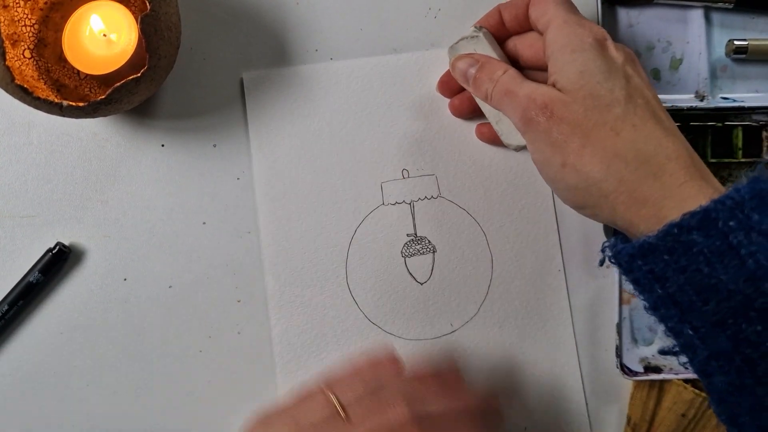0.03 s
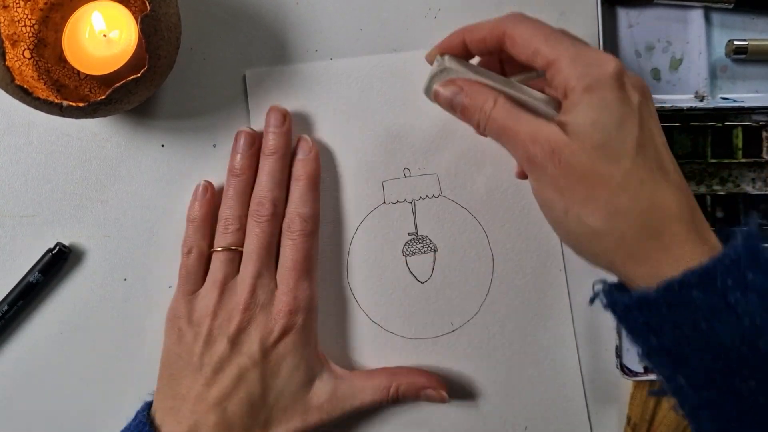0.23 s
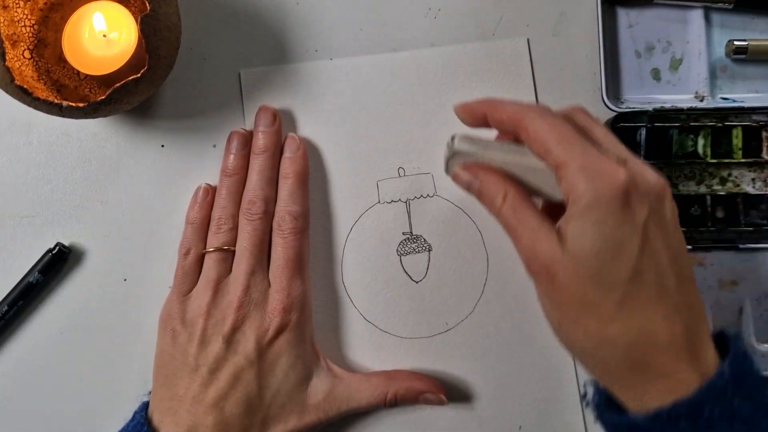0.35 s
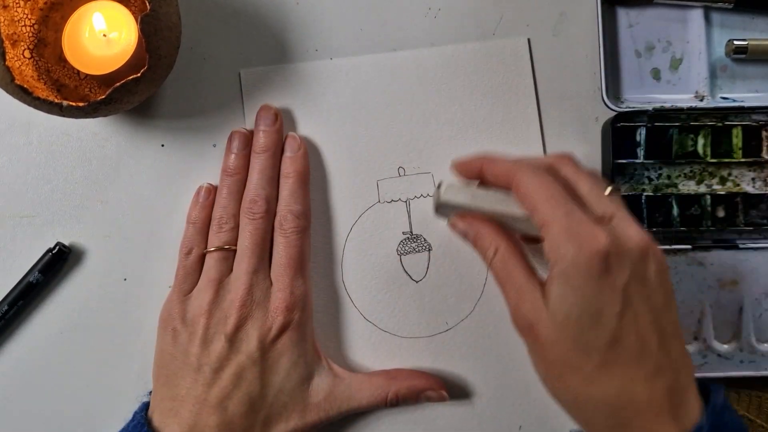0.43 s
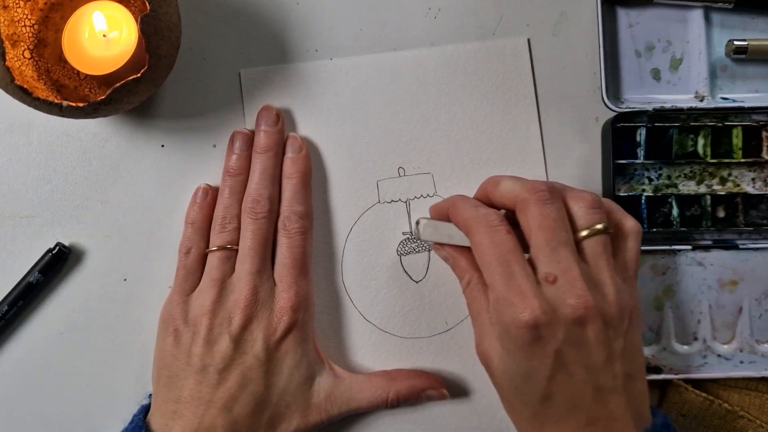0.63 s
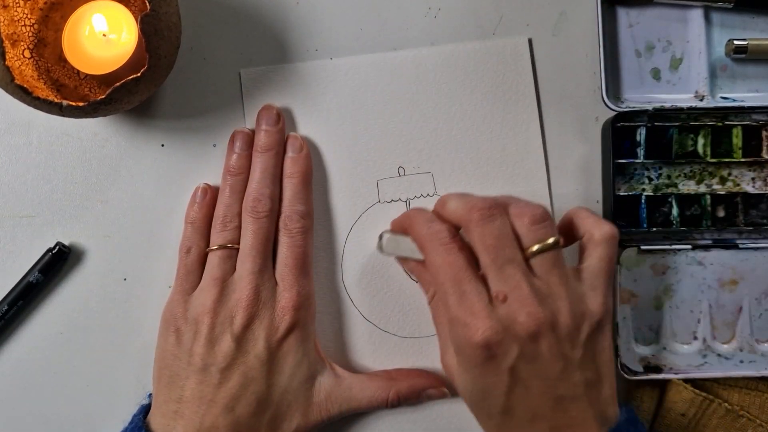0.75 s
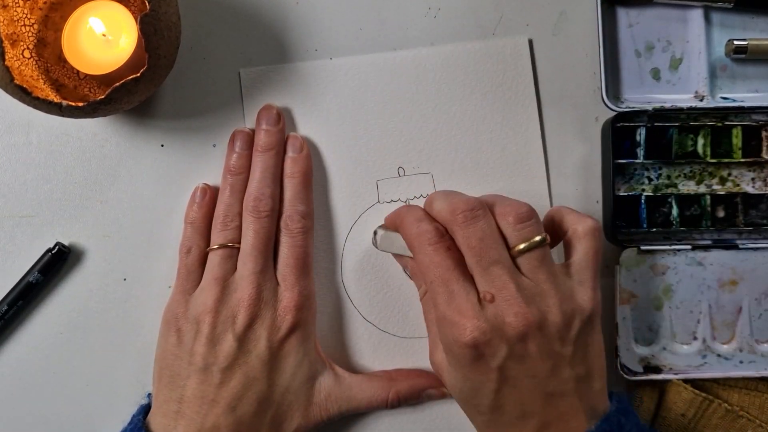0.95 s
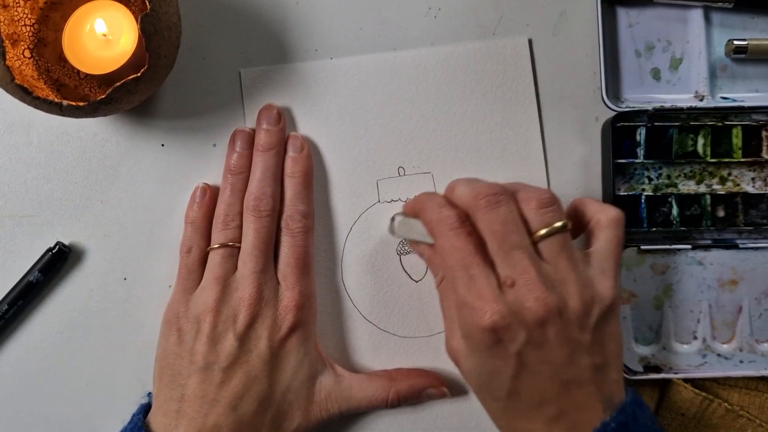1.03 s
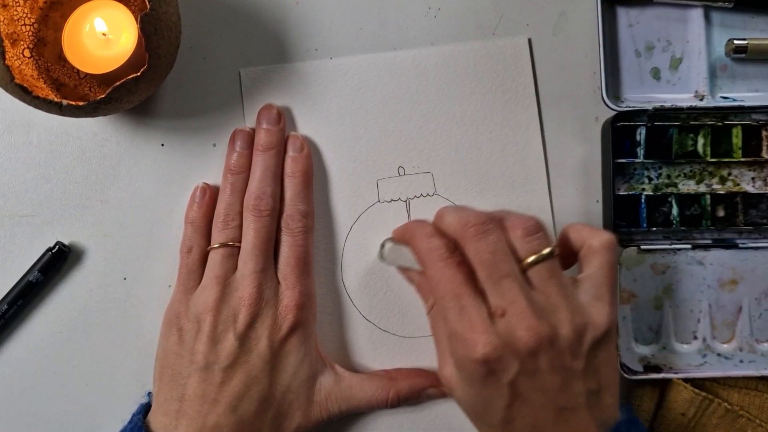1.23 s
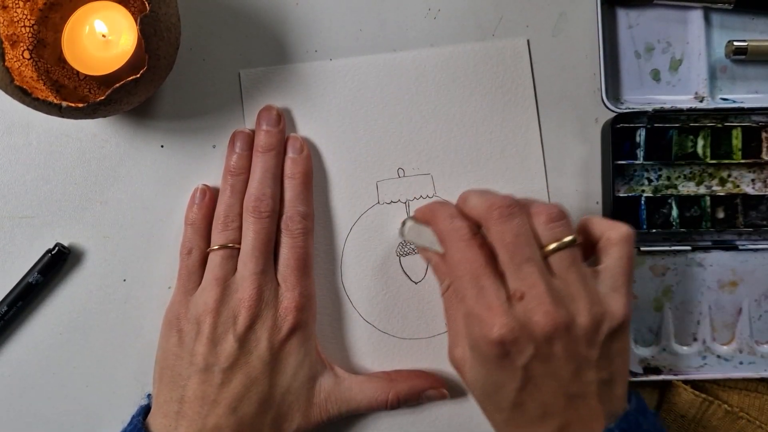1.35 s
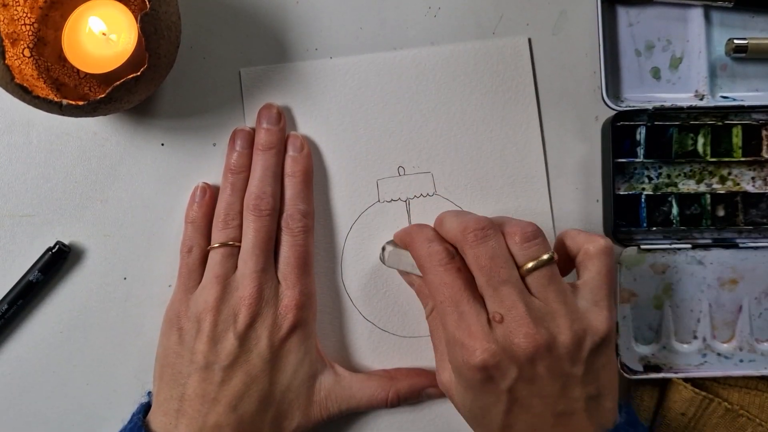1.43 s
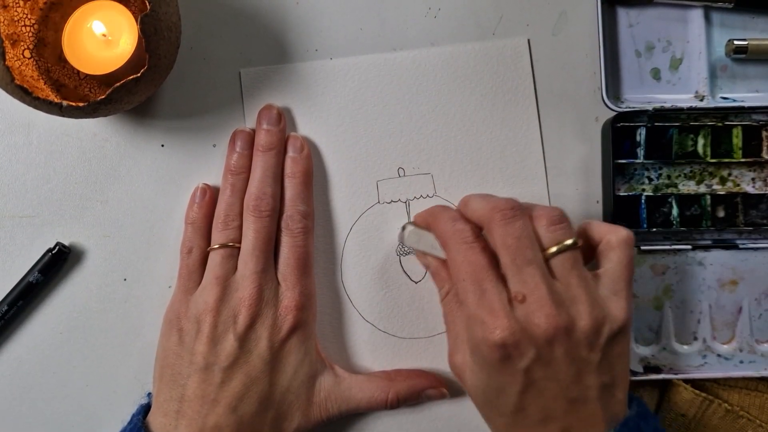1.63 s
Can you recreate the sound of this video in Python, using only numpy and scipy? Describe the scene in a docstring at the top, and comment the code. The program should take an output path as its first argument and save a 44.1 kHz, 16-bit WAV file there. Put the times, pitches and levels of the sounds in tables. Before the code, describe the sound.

An eraser rubs thick paper in short soft strokes after one sharp hard tap on the desk

```python
"""An eraser rubs pencil lines off thick paper on a desk: short strokes of filtered friction grains.
As the hands settle, something hard taps the desk and bounces once, ringing modes and a noisy clack.
Noise bumps of the hands and sheet, two swishes of skin, two ticks and a creaky scuff with a faint squeak join in.
All is close to a stereo microphone in a small room, over steady room noise and a low desk rumble."""
import sys
import numpy as np
from scipy import signal
from scipy.fft import rfft, irfft
from scipy.io import wavfile

SR = 44100
rng = np.random.default_rng(int(sys.argv[2]) if len(sys.argv) > 2 else 0)


def wrap_up_sound(samples):
    """Save the sound to the file named by the first command line argument, as 16-bit audio."""
    columns = np.atleast_2d(samples).T
    # keep every value between -1 and 1, then stretch to whole-number steps
    tamed = np.clip(columns, -1, 1)
    steps = np.round(tamed * 32767).astype(np.int16)
    wavfile.write(sys.argv[1], SR, steps)


N = 74970  # samples
T = np.arange(N) / SR  # time axis, s
SIZE = 131072  # FFT length, samples
HZ = np.maximum(np.fft.rfftfreq(SIZE, 1 / SR), 1)  # frequency axis, Hz


def amp(db):
    """Decibels to gain."""
    return 10 ** (np.asarray(db) / 20)


def unit(x):
    """Scale to rms 1."""
    return x / np.sqrt(np.mean(x ** 2) + 1e-20)


def at_hz(points, hz):
    """Read a (Hz, value) table along log frequency."""
    f, value = np.transpose(points)
    return np.interp(np.log(hz), np.log(f), value)


def level(points):
    """Gain over time from (s, dB) points."""
    return amp(np.interp(T, *np.transpose(points)))


def fade(t, t60):
    """Decay by 60 dB in t60 seconds, silent before t = 0."""
    return (t >= 0) * np.exp(-np.log(1000) * np.maximum(t, 0) / t60)


def colour(x, db):
    """Causal (minimum-phase) filter with the given gain in dB at each frequency of HZ."""
    cepstrum = irfft(np.log(amp(db)))
    # Folding the cepstrum onto positive times makes the filter minimum-phase.
    cepstrum[1:SIZE // 2] *= 2
    cepstrum[SIZE // 2 + 1:] = 0
    response = np.exp(rfft(cepstrum))
    return irfft(rfft(x, SIZE) * response)[..., :N]


def ring(x, hz, t60):
    """One mode: a unit click sets a decaying sine of height 1 ringing."""
    radius = np.exp(-np.log(1000) / (t60 * SR))
    w = 2 * np.pi * hz / SR
    return signal.lfilter([0, np.sin(w)], [1, -2 * radius * np.cos(w), radius * radius], x + 1e-18)


def click(s):
    """A unit click at time s."""
    return 1. * (np.arange(N) == int(s * SR))


def grains(per_s, spread_db):
    """Random tiny slips of uneven size and either sign; rms 1."""
    sizes = amp(spread_db * np.minimum(rng.exponential(1, N), 5))
    signs = rng.choice([-1, 1], N)
    return unit(sizes * signs * (rng.random(N) < per_s / SR))


def wander(hz):
    """Random wavering, low-passed at the given rate; rms 1."""
    lowpass = signal.butter(2, hz, fs=SR, output="sos")
    return unit(signal.sosfilt(lowpass, rng.standard_normal(N)))


def diffuse():
    """White stereo noise, much alike on both sides in the bass and nearly unrelated in the treble."""
    # Left-right likeness: f/Hz, likeness 0-1
    likeness = [(50, 0.89), (330, 0.86), (700, .35), (1500, 0.057), (8000, 0.023)]
    mid, side = rfft(rng.standard_normal((2, SIZE)))
    alike = np.clip(at_hz(likeness, HZ), 0, 1)
    return irfft(np.sqrt(1 + alike) * mid + np.sqrt(1 - alike) * side * [[1], [-1]])[:, :N]


def swing(start, length, peak):
    """Loudness of one stroke: the hand speeds up to its peak and slows to a stop."""
    speed_power = 0.9
    peak_time = start + length * np.clip(peak, .05, .95)
    phase = np.interp(T, [start, peak_time, start + length], [0, .5, 1])
    return np.maximum(np.sin(np.pi * phase), 0) ** speed_power


def contact(x, bright_hz, cut_hz):
    """A contact's softness rounds off the treble, its lightness takes away the bass."""
    r = np.exp(-2 * np.pi * bright_hz / SR)
    softened = signal.lfilter([(1 - r) ** 2], [1, -2 * r, r * r], x + 1e-18)
    return signal.lfilter(*signal.butter(1, cut_hz, "high", fs=SR), softened)


def skin(start, length, db, peak, spectrum):
    """Skin slides over paper or desk in one fine-grained swish."""
    swish = unit(colour(grains(per_s=4600, spread_db=2.0), at_hz(spectrum, HZ)))
    return amp(db) * swing(start, length, peak) * swish


def background():
    """Steady noise gives the room's hush; swelling bass noise is the desk under the working hands."""
    # Spectrum of the room noise: f/Hz, level/dB
    hush_colour = [(25, -1.5), (50, -1.5), (85, -6.5), (140, -16), (220, -19), (350, -14), (500, -22.5),
                   (1000, -21.5), (2000, -23), (4000, -29), (8000, -39.5), (11000, -50.5), (16000, -57.5)]
    # Spectrum of the desk rumble: f/Hz, level/dB
    rumble_colour = [(20, -6), (40, -3), (65, -6), (100, -26.5), (250, -49), (800, -70)]
    # Rumble fader: t/s, level/dB
    rumble_level = [(0, -84), (.2, -75), (.27, -50), (.4, -65.5), (.56, -74.5), (.7, -69), (.95, -68),
                    (1.08, -74), (1.3, -74), (1.4, -59.5), (1.53, -72), (1.66, -57.5)]
    hush_db = -70
    hush = amp(hush_db) * unit(colour(diffuse(), at_hz(hush_colour, HZ)))
    rumble = level(rumble_level) * unit(colour(diffuse(), at_hz(rumble_colour, HZ)))
    return hush + rumble


def eraser():
    """Rubber catches on paper fibres; each stroke has its own pressure and brightness."""
    # Strokes: start t/s, length/s, level/dB, treble tilt/dB per octave, place of the peak/0-1
    strokes = [(0.132, 0.047, -68.5, 11, 0.2), (0.645, 0.071, -62, -0.5, 0.57),
               (0.762, 0.084, -61.5, 0.5, 0.68), (.888, 0.076, -64, 0, 0.4),
               (1.009, 0.066, -63.5, 1.5, 0.62), (1.112, 0.083, -61, -2.5, 0.34),
               (1.237, 0.075, -65.5, 2, 0.55), (1.343, 0.096, -63, -4.5, 0.27),
               (1.479, 0.076, -66.5, 0.5, 0.46), (1.597, 0.065, -66.5, -5, 0.13)]
    # Spectrum of rubbed paper: f/Hz, level/dB
    paper_colour = [(300, -14), (1000, -14), (2200, -11), (3300, -7), (4400, 1.5), (5000, -5.5),
                    (5450, 2.5), (5900, -6.5), (7000, -9), (7800, -9.5), (9700, -14.5), (11300, -22),
                    (13500, -23), (16000, -27)]
    chatter_db, chatter_hz = 1.17, 110.4  # rms depth and rate limit of the rubber's fluttering grip
    tilt_pivot_hz = 5490
    grip = amp(chatter_db * wander(chatter_hz))
    friction = grains(per_s=17000, spread_db=2.5) * grip
    paper = at_hz(paper_colour, HZ)
    # The tilt levels out below half the pivot.
    octaves = np.log2(np.maximum(HZ, tilt_pivot_hz / 2) / tilt_pivot_hz)
    rubbing = 0
    for start, length, db, tilt, peak in strokes:
        rub = unit(colour(friction, paper + tilt * octaves))
        rubbing = rubbing + amp(db) * swing(start, length, peak) * rub
    return rubbing


def tap():
    """A quick cluster of hard contacts, a bounce and a last touch excite modes, a short clack and desk sway."""
    # Hard contacts on the desk: t/s, level/dB, brightness f/Hz, bass cut f/Hz
    hits = [(0.2243, -31.5, 11110, 476), (0.2325, -27, 10820, 500), (.2392, 1, 6030, 198),
            (0.2427, -2, 11000, 201), (0.2466, -0.5, 6100, 150), (0.253, -4.5, 5000, 150),
            (0.2576, -4, 6000, 200), (.268, -9.5, 9000, 300), (.3105, -6.5, 4140, 1290),
            (0.314, -12, 3700, 900), (.323, -13.5, 2950, 700), (.337, -18, 2800, 600),
            (0.5972, -38.5, 6000, 800)]
    # Ringing modes: f/Hz, level/dB, t60/s
    tap_modes = [(356, -22, 0.48), (723.7, -19, 0.5), (1076, -18.5, 0.64), (1369.4, -3, 0.15),
                 (1524, -14.5, 0.057), (1715, -6.5, 0.056), (2042, -1, 0.11), (2092, -11.5, 0.064),
                 (2648, -10.5, 0.089), (3259, -15.5, 0.11), (3355, -9.5, 0.067), (4086, -19, .13),
                 (4720, -14, 0.1)]
    # Spectrum of the dense clack under the modes: f/Hz, level/dB
    clack_colour = [(40, -18.5), (150, -24.5), (300, -17), (500, -10.5), (900, -10), (1450, 1.5),
                    (1850, -6), (2080, 2), (2350, -3), (2700, -1), (3400, -3.5), (4500, -14.5),
                    (5400, -24.5), (6400, -16.5), (8000, -21), (11000, -28), (16000, -29)]
    ring_db, clack_db, clack_t60 = -27, 12.5, .022  # dB, dB, s
    desk_hz, desk_db, desk_t60 = 36, -63, .4  # sway of the desk top: Hz, dB, s
    mode_spread_db = 4  # each contact favours other modes

    forces = np.array([amp(db) * contact(click(s), bright_hz, cut_hz)
                       for s, db, bright_hz, cut_hz in hits])
    shares = amp(mode_spread_db * rng.standard_normal((len(hits), len(tap_modes))))
    ringing = 0
    for share, (hz, db, t60) in zip(shares.T, tap_modes):
        ringing = ringing + amp(db + ring_db) * ring(share @ forces, hz, t60)

    noise = unit(diffuse()) / np.linalg.norm(fade(T, clack_t60))  # a burst has energy near 1
    cracks = 0
    for s, db, bright_hz, cut_hz in hits:
        burst = noise * fade(T - s, clack_t60)
        cracks = cracks + amp(db) * contact(burst, bright_hz, cut_hz)
    clack = colour(cracks, at_hz(clack_colour, HZ) + clack_db)

    sway = amp(desk_db) * ring(forces.sum(axis=0), desk_hz, desk_t60)
    return clack + ringing + sway


def bumps():
    """Hands and sheet bump dully against the desk: soft-edged bursts of low noise."""
    # Bumps: t/s, level/dB, tilt/dB per octave
    thuds = [(0.234, -52, -0.5), (.26, -57, -5), (.68, -62, 0), (1.114, -57, -2.5), (1.143, -54.5, -2),
             (1.302, -60.5, 2), (1.352, -59, 0), (1.404, -58, 2), (1.594, -56.5, -.5), (1.656, -68.5, 1.5)]
    # Spectrum of a bump before its tilt: f/Hz, level/dB
    bump_colour = [(25, -12.5), (60, 1.5), (110, -3.5), (175, 4.5), (260, -9), (360, 2), (450, -22.5),
                   (900, -28), (3000, -50.5)]
    attack, t60, pivot_hz = 0.0036, 0.19, 150  # s, s, Hz
    noise, octaves = diffuse(), np.log2(HZ / pivot_hz)
    dull = at_hz(bump_colour, HZ)
    bumping = 0
    for s, db, tilt in thuds:
        envelope = np.clip((T - s) / attack, 0, 1) * fade(T - s, t60)
        bumping = bumping + amp(db) * envelope * unit(colour(noise, dull + tilt * octaves))
    return bumping


def hand_slide():
    """The flat hand slides onto the sheet: friction grains with a bright paper colour."""
    # One slide: start t/s, length/s, level/dB, place of the peak/0-1
    slide = (.435, .066, -55, .25)
    # Spectrum of the slide: f/Hz, level/dB
    slide_colour = [(150, -13), (400, -3), (700, 3.5), (1100, 1.5), (1800, -2), (3100, 1.5), (4500, 3),
                    (6000, -3.5), (6700, -0.5), (8000, -8.5), (12000, -17), (16000, -15)]
    return skin(*slide, slide_colour)


def skin_brush():
    """Skin brushes softly on the desk: friction grains with a dull colour."""
    # One brush: start t/s, length/s, level/dB, place of the peak/0-1
    brush = (.941, .056, -61.5, .4)
    # Spectrum of the brush: f/Hz, level/dB
    brush_colour = [(150, -10), (400, -8), (560, 3.5), (750, -9), (1000, 4.5), (1500, -4.5), (2200, -3.5),
                    (3000, -11), (6000, -40)]
    return skin(*brush, brush_colour)


def ticks():
    """Light contacts: a sharp edge and a brief woody ring with one overtone."""
    # Ticks: t/s, ring level/dB, pitch f/Hz, sharp edge level/dB
    touches = [(1.3033, -45.5, 1344, -31), (1.3409, -51, 1448, -44)]
    # Spectrum of the sharp edge: f/Hz, level/dB
    edge_colour = [(150, 8.5), (700, 7.5), (2200, -9), (3400, 3.5), (5000, 2.5), (7500, -7), (14000, -27)]
    t60, overtone_hz, overtone_db = 0.037, 3335, -13  # s, Hz, dB
    edges, rings = 0, 0
    for s, db, hz, edge_db in touches:
        edges = edges + amp(edge_db) * click(s)
        overtone = amp(overtone_db) * ring(click(s), overtone_hz, t60)
        rings = rings + amp(db) * (ring(click(s), hz, t60) + overtone)
    return colour(edges, at_hz(edge_colour, HZ)) + rings


def scuff():
    """Uneven slips drive a few hollow resonances into a creaky scuff."""
    # Scuff fader: t/s, level/dB
    scuff_level = [(1.31, -87), (1.345, -61), (1.39, -59), (1.41, -58), (1.445, -66), (1.48, -67.5),
                   (1.51, -74.5), (1.57, -82.5)]
    # Resonances: f/Hz, level/dB, t60/s
    scuff_modes = [(354, -10, .06), (735, -8.5, 0.048), (900, -8.5, .01), (1400, -5.5, 0.06),
                   (1560, 4.5, 0.014), (1900, -9, 0.017)]
    slips = grains(per_s=810, spread_db=2.0)
    creak = unit(sum(amp(db) * ring(slips, hz, t60) for hz, db, t60 in scuff_modes))
    sounding = (T > scuff_level[0][0]) * (T < scuff_level[-1][0])
    return level(scuff_level) * sounding * creak


def squeak():
    """Sticking and slipping rubber gives a thin, unsteady tone within the scuff."""
    # Squeak path: t/s, pitch f/Hz, level/dB
    squeak_path = [(1.335, 1475, -94), (1.35, 1547, -72), (1.385, 1593, -71), (1.413, 1615, -55),
                   (1.434, 1616, -64), (1.475, 1573, -60), (1.51, 1534, -77), (1.54, 1570, -99)]
    jitter, jitter_hz = 0.0614, 170  # rms fraction of the pitch, rate limit
    s, hz, db = np.transpose(squeak_path)
    pitch = np.interp(T, s, hz) * (1 + jitter * wander(jitter_hz))
    sounding = (T > s[0]) * (T < s[-1])
    return amp(np.interp(T, s, db)) * sounding * np.sin(2 * np.pi * np.cumsum(pitch) / SR)


def room_response():
    """Early reflections off the desk things, a frequency-dependent tail and a faint lingering part."""
    # Decay of the tail: f/Hz, t60/s
    room_t60 = [(100, 0.21), (350, 0.6), (800, .32), (2000, 0.24), (4000, .24), (8000, .21), (15000, .18)]
    # Spectrum of the lingering part: f/Hz, level/dB
    late_colour = [(150, -11.5), (400, -8), (750, 8), (1100, 2.5), (2000, -5), (4000, -12), (8000, -22.5),
                   (16000, -36.5)]
    early_db, tail_db, late_db = 0.5, -2, -16.5
    early_t60, late_t60, delay = 0.049, .9, .001  # s; the delay is the tail's
    noise, centres = rfft(diffuse(), SIZE), np.geomspace(100, 16000, 12)
    tail = 0
    # Overlapping bands, each with its own decay
    for hz, pick in zip(centres, np.eye(len(centres))):
        band = irfft(noise * np.interp(np.log(HZ), np.log(centres), pick))[:, :N]
        tail = tail + band * fade(T - delay, at_hz(room_t60, hz))
    early = unit(diffuse() * fade(T, early_t60))
    late = colour(unit(diffuse() * fade(T, late_t60)), at_hz(late_colour, HZ))
    return (amp(early_db) * early + amp(tail_db) * unit(tail) + amp(late_db) * late) / np.sqrt(N)


def in_room(x, response, wet_db):
    """Direct sound plus reflections, at about the same total power."""
    reflections = signal.fftconvolve(np.atleast_2d(x), response, axes=1)[:, :N]
    return (x + amp(wet_db) * reflections) / np.sqrt(1 + 2 * amp(2 * wet_db))


def scene():
    """The contact sounds share one room at their own wet levels; bumps and background stay dry."""
    room = room_response()
    rubbing = in_room(eraser() + hand_slide() + skin_brush(), room, wet_db=2)
    tapping = in_room(tap(), room, wet_db=-4)
    ticking = in_room(ticks(), room, wet_db=-5.5)
    scuffing = in_room(scuff() + squeak(), room, wet_db=-4.5)
    return rubbing + tapping + ticking + scuffing + bumps() + background()


def record(dry):
    """The two microphones differ a little in colour; the top is cut steeply."""
    # Stereo balance: f/Hz, left minus right level/dB
    balance = [(50, 1.2), (300, 3), (1000, 1.5), (2500, 4.5), (5000, 2.5), (8000, -0.5), (12000, -3.5)]
    cutoff_hz = 15500
    sides = amp(at_hz(balance, HZ) * np.array([[.5], [-.5]]))
    top = 1 / np.sqrt(1 + (HZ / cutoff_hz) ** 160)
    return irfft(rfft(dry, SIZE) * sides * top)[:, :N]


dry = scene()
out = record(dry)
wrap_up_sound(out)
```